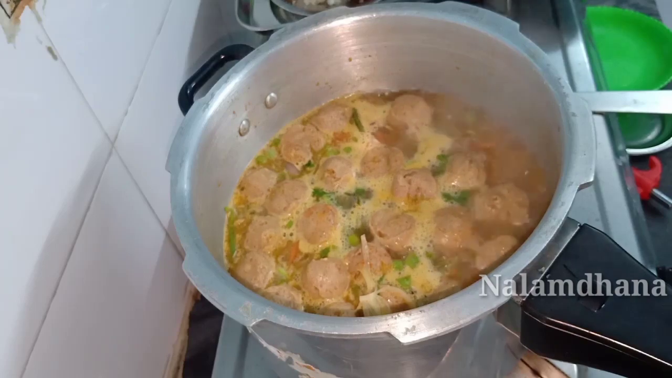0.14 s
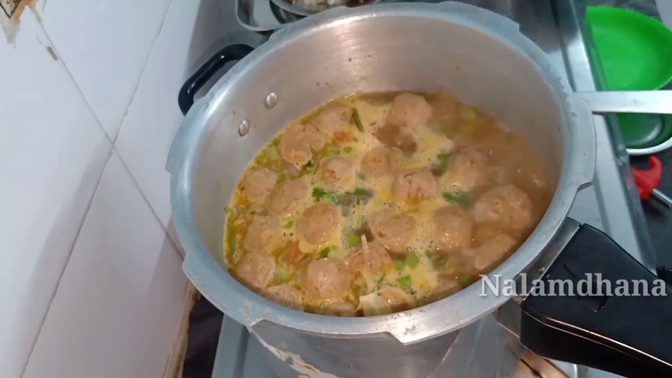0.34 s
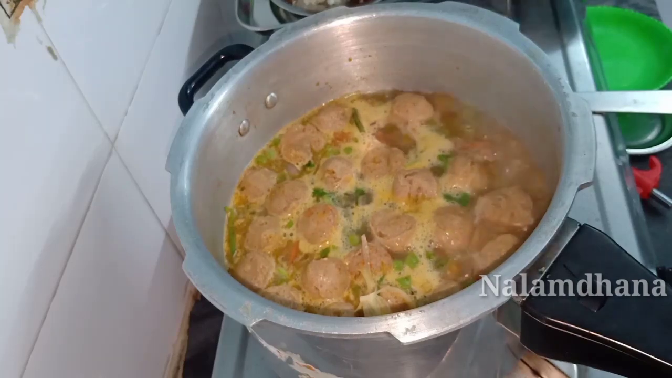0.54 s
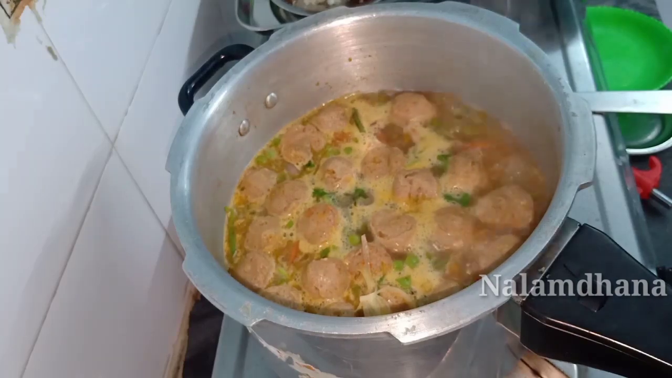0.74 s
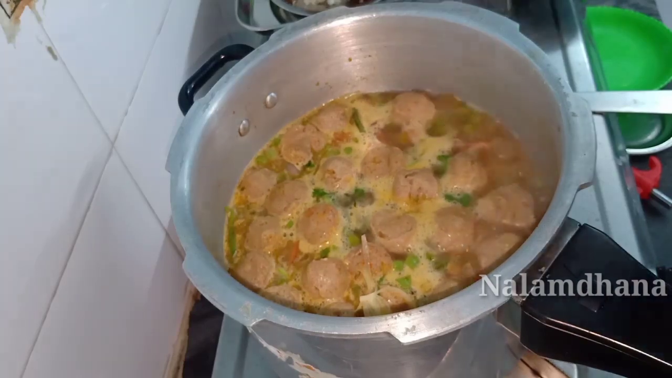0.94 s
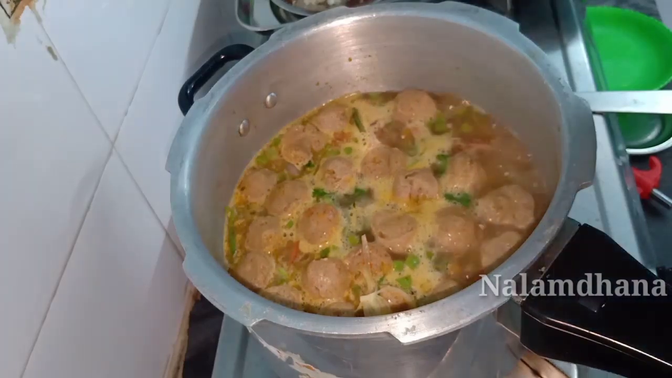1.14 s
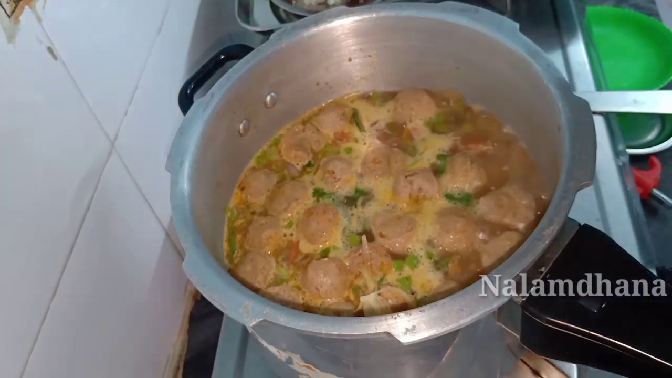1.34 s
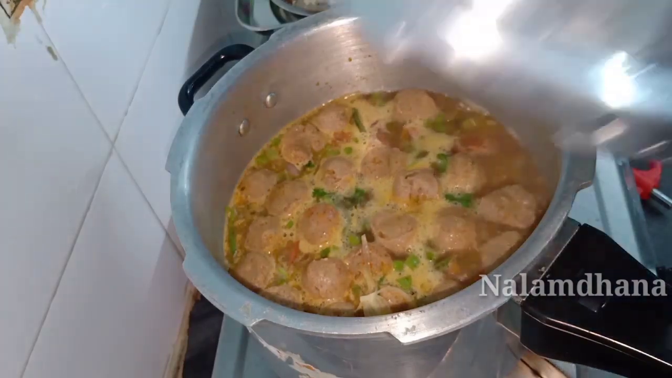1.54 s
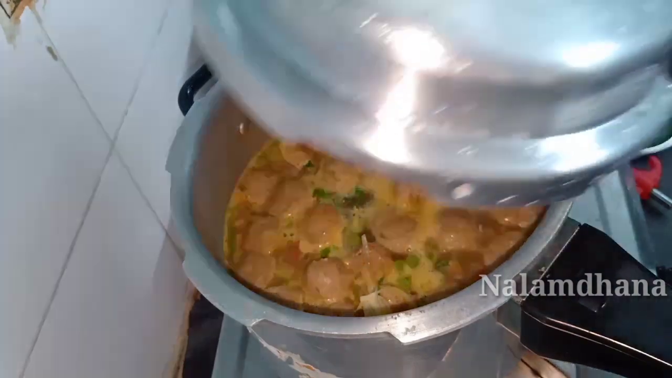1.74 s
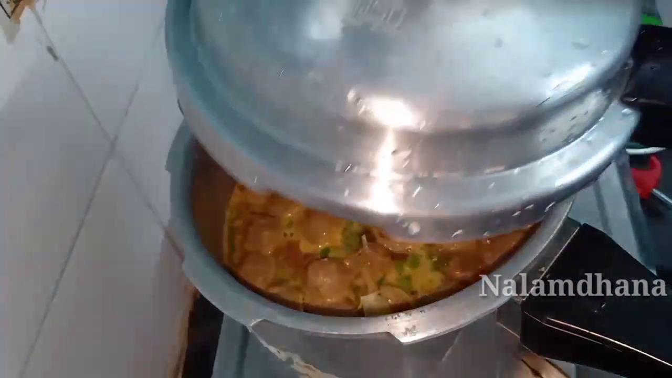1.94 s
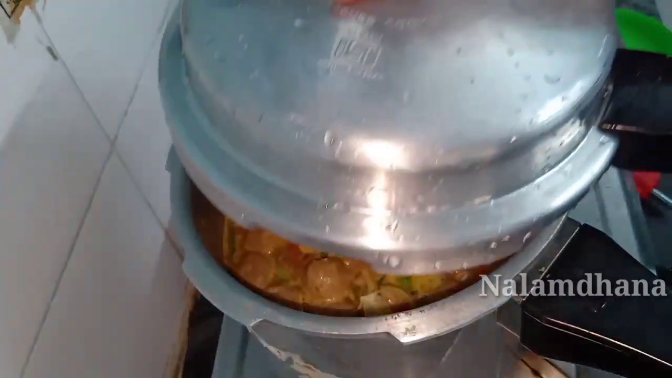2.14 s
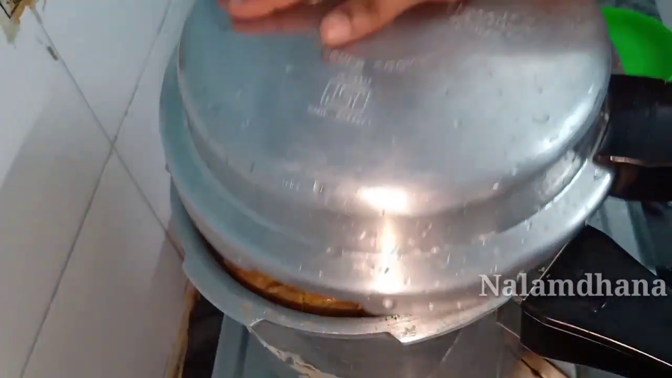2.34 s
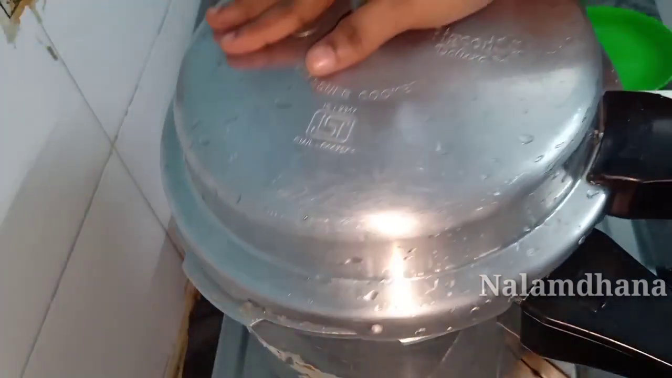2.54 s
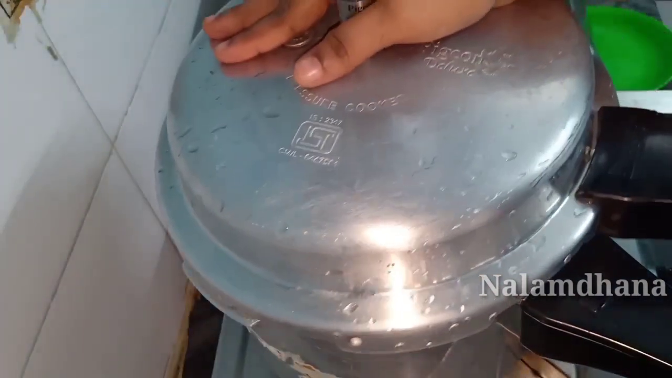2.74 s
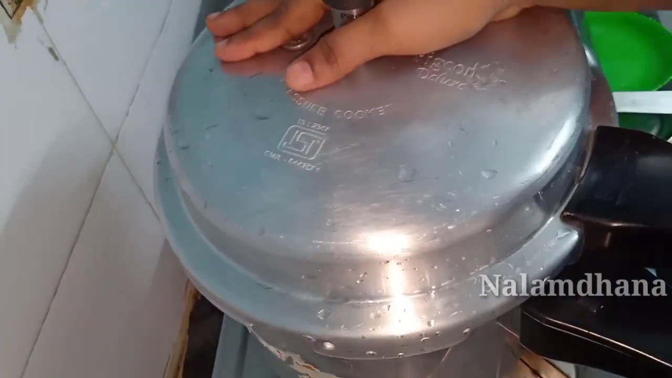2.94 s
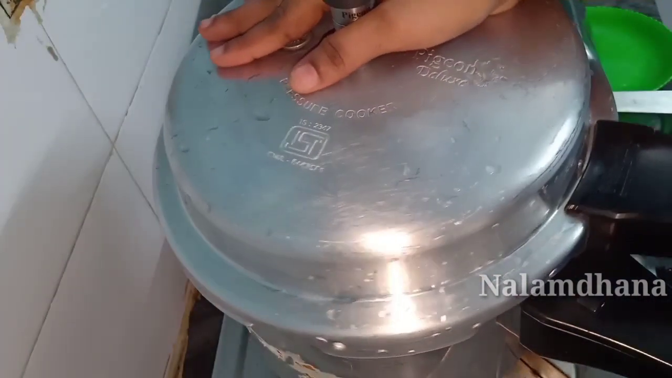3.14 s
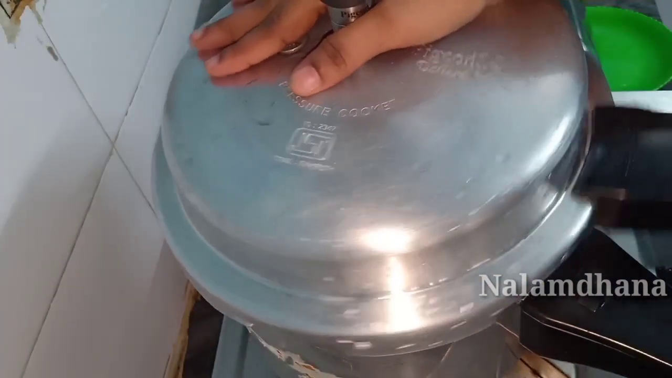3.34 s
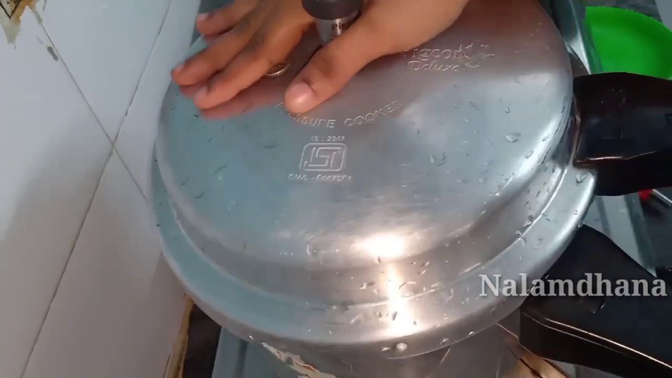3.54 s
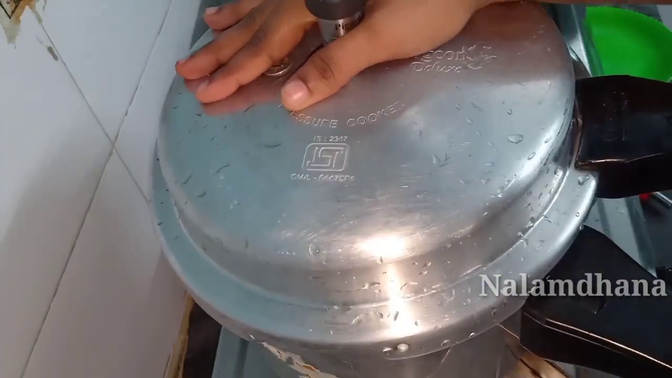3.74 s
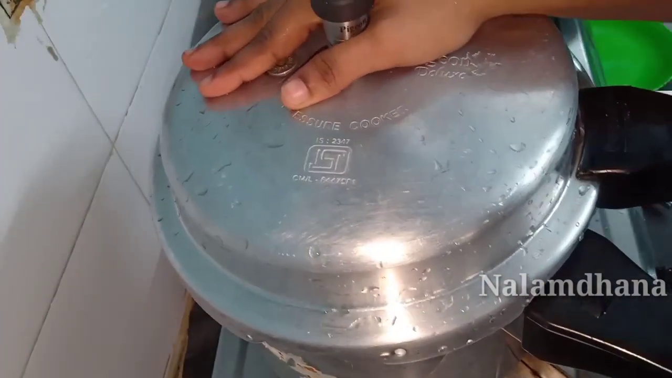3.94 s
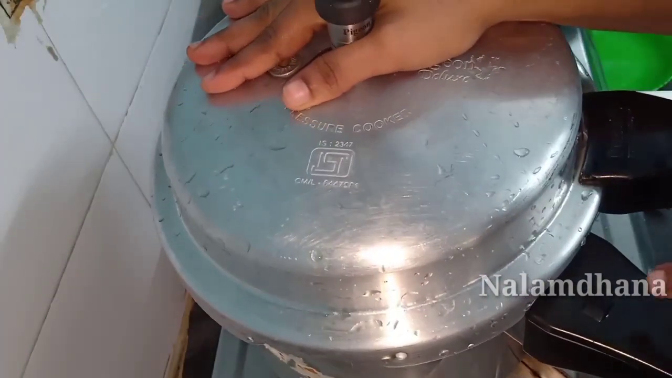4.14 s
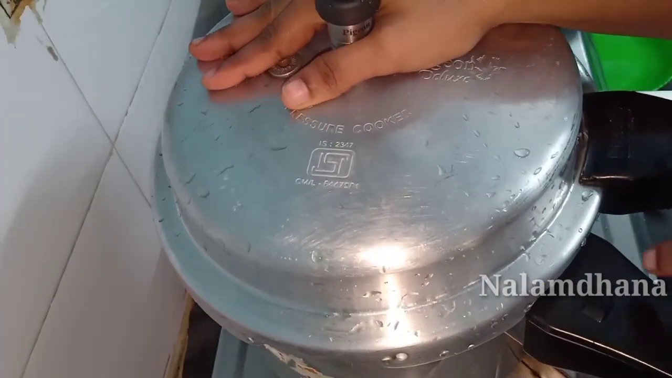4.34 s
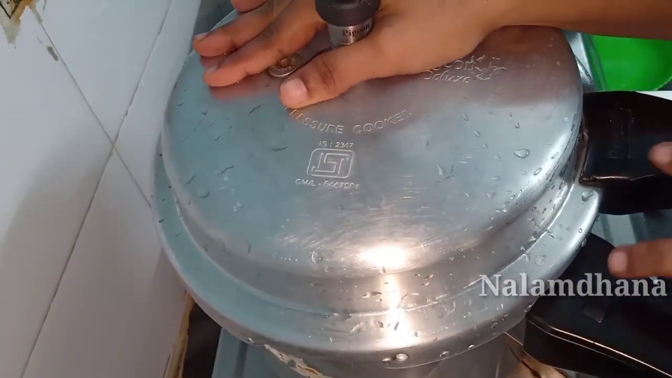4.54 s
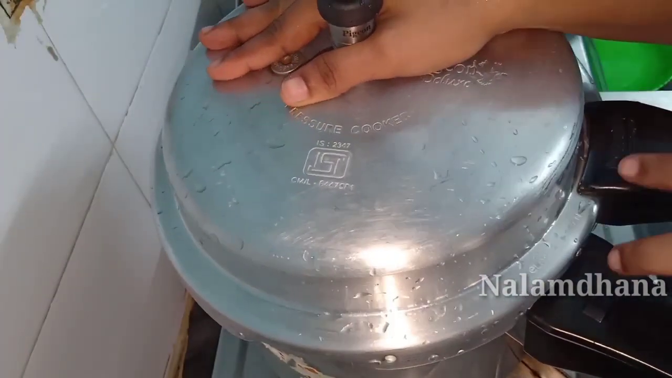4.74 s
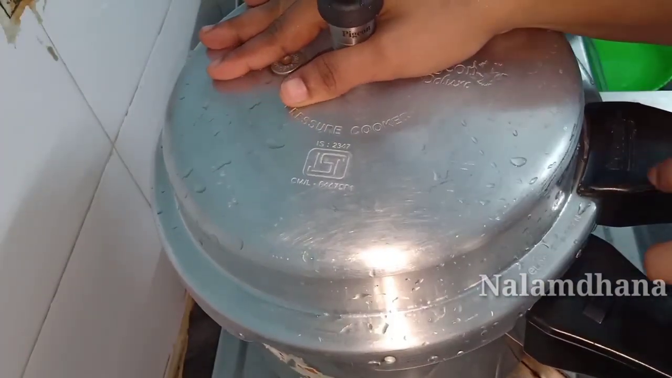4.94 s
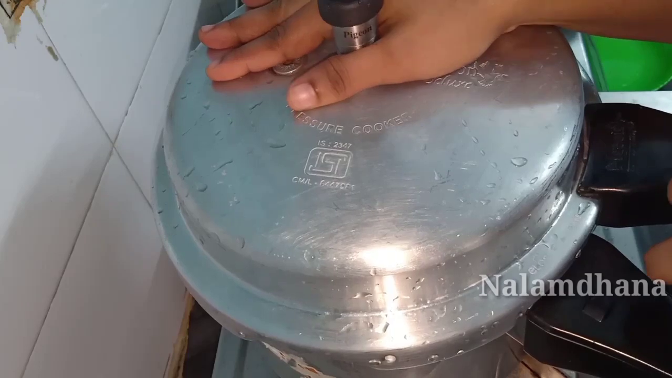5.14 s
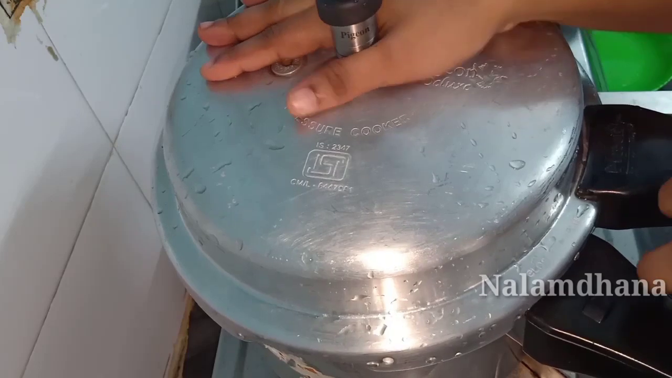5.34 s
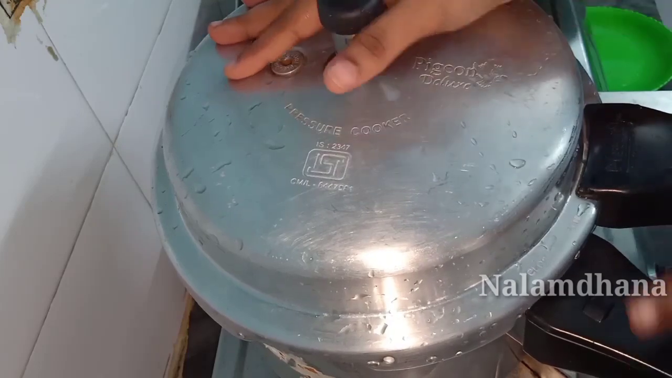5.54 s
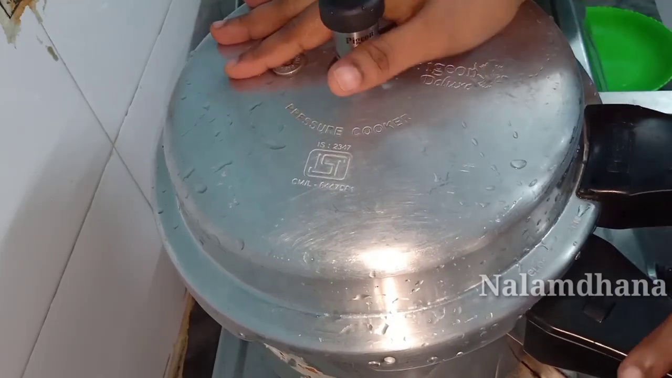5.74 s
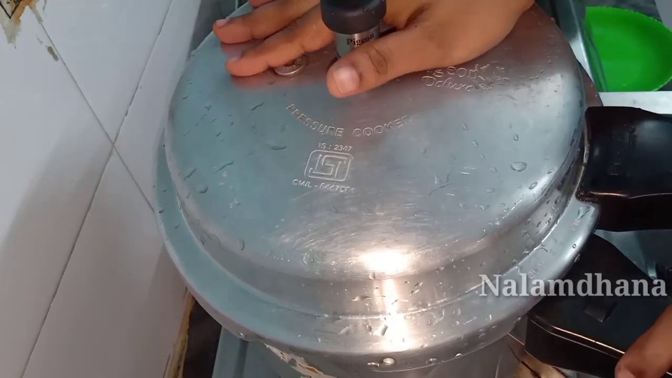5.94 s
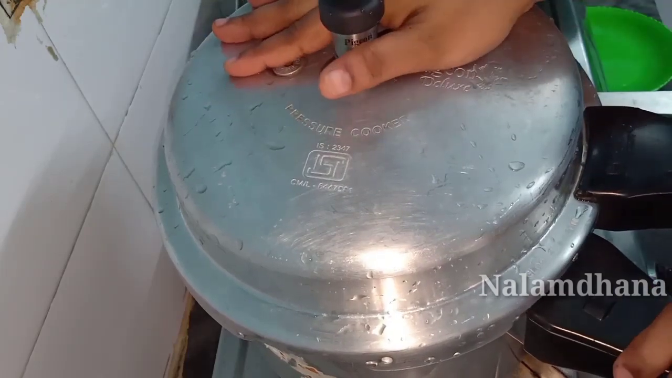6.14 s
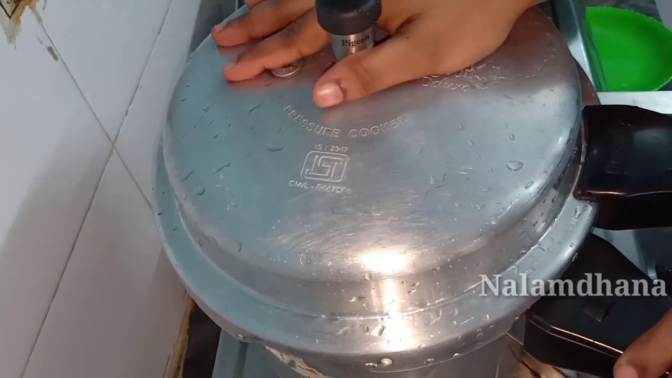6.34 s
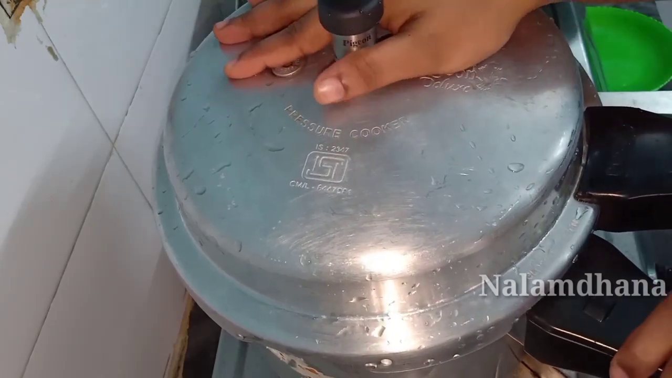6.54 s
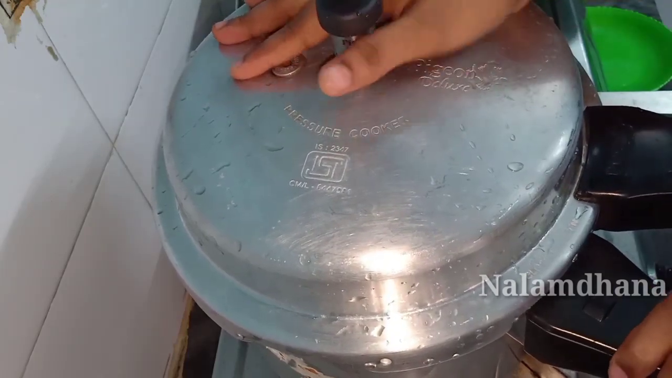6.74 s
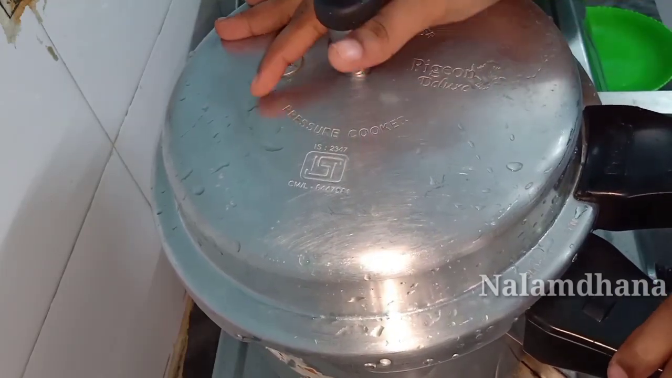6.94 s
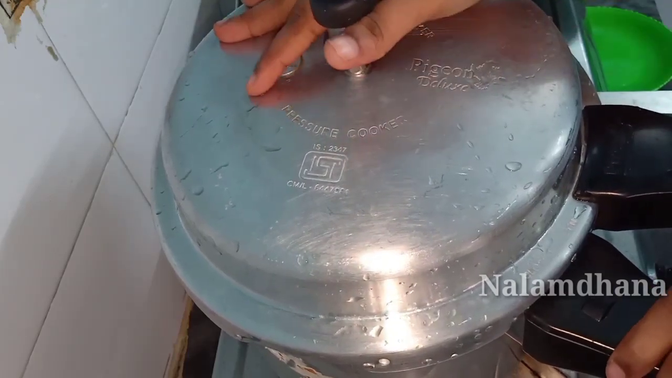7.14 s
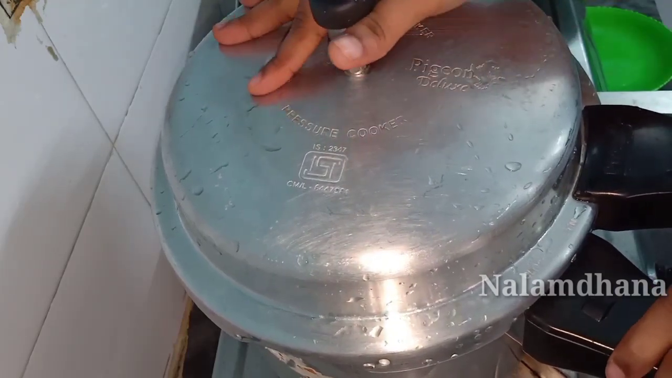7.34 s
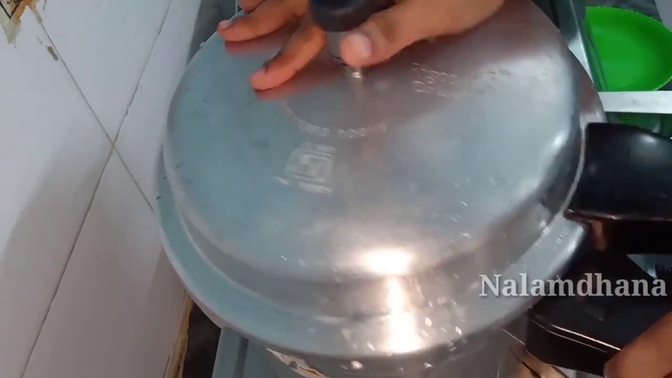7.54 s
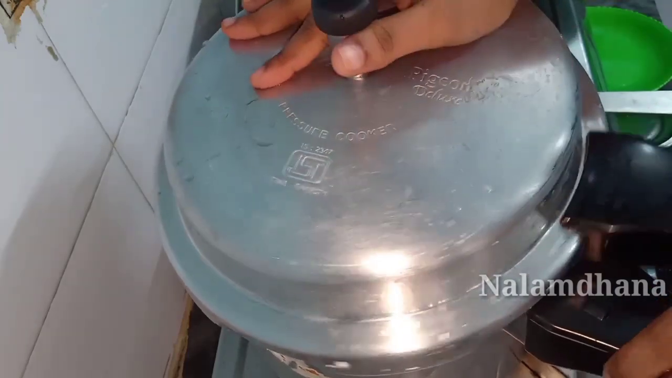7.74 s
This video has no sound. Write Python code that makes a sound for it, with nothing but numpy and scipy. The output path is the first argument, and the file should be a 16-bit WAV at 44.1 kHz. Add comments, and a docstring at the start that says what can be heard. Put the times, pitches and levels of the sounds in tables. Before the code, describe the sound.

At about 0.5 seconds a thin metal lid is picked up, close and to the left, with a bright clatter and a brief ringing scrape. After a quiet stretch, it knocks several times onto a pressure cooker in front, from 2.3 to 2.9 seconds. A loud, fuller clank with scraping comes around 3.4 to 3.5 seconds. Light ticks follow, then a sharp clink at 4.7, smaller taps, and a loud, bright scraping clatter near 5.5. A softer scrape sounds around 6.8, and a last strong knock and scrape at 7.5 seconds, trailed by faint taps. Steam hisses very faintly at first, growing a little from 3.6 seconds and swelling unevenly, with thin, airy whistles from about 3.7 to 5 and 6.6 to 8 seconds. The small tiled kitchen gives the metal a short echo, over a very faint rumble, low drone and electric hum.

```python
"""A metal lid clatters as it is picked up, then knocks, scrapes and twists onto a pressure cooker.
Every touch makes the metal ring briefly; a scrape is many tiny touches close together.
Steam from the hot stew hisses, and at times whistles, through the gap under the rim.
The small tiled kitchen echoes the metal, over a faint rumble, a low drone and an electric hum."""
import sys
import numpy as np
from scipy import signal
from scipy.io import wavfile
from scipy.ndimage import uniform_filter1d

SR = 44100
rng = np.random.default_rng(int(sys.argv[2]) if len(sys.argv) > 2 else 0)


def store_wav(level_fs):
    """Save 16-bit WAV to argv[1]."""
    pcm = np.round(np.clip(np.atleast_2d(level_fs), -1, 1) * 32767)
    wavfile.write(sys.argv[1], SR, pcm.T.astype(np.int16))


N = 348390
BAND_EDGES_HZ = 30 * 2 ** np.arange(0, 9.2, .5)   # half an octave apart


# Knocks and clinks on counter and pot, with a few faint bright ticks:
# t/s, level/dB, bass/dB, treble/dB, favoured f/Hz
COOKER_KNOCKS = [(0.679, -25, -15, -11, 1090), (1.089, -36, -14, -11, 1140), (2.346, -16, -7.5, -9.5, 1640),
                 (2.423, -34.5, 7, -12, 1780), (2.585, -12, -3, -22, 1800), (2.592, -21, 0.5, -24, 170),
                 (2.694, -31.5, 2, -17, 2420), (2.796, -15, -4, -18.5, 1760), (2.806, -22, 4, -11, 292),
                 (2.862, -24, 0, -13, 1180), (3.116, -38.5, -0.5, -18, 291), (3.326, -31, -8, -21.5, 1750),
                 (3.399, -4.5, -8, -15.5, 292), (3.417, -7.5, -6.5, -9.5, 1070),
                 (3.465, -7.5, -3, -16, 1780), (3.476, -17, 1.5, -17, 169), (3.489, -7, -10.5, -4, 2230),
                 (3.51, -16.5, -7, -22, 880), (3.678, -28.5, -2.5, -22, 556),
                 (3.813, -19.5, -2.5, -4.5, 2210), (3.981, -30.5, -2, -15, 480),
                 (4.018, -40.5, 9, 10.5, 3640), (4.1, -37.5, 2, 9.5, 2980), (4.335, -34.5, -6.5, -1, 2890),
                 (4.425, -33, -5, -6, 2565), (4.667, -11, -12, 1, 870), (4.669, -9, -14, -14, 1770),
                 (4.672, -11.5, -9, -22, 2730), (4.819, -24, -21, 4, 2300), (5.062, -18, -7, -3.5, 1725),
                 (5.235, -24.5, -6.5, 2.5, 1930), (5.412, -31, -7, 13.5, 1710),
                 (5.455, -15, -10, -21, 2308), (5.462, -6, -36, -1.5, 1859), (5.472, -6.5, -30, -14, 2300),
                 (5.487, -12, -16, -8, 2380), (5.496, -17, -27, -10, 2380), (5.505, -10, -19, -9, 2080),
                 (5.523, -11.5, -23, -8, 1760), (5.673, -33, -17, -2, 1400), (5.78, -40, -8, -19, 2000),
                 (5.855, -28.5, 0, -11.5, 918), (6.0, -45.5, -20, 8.5, 3000), (6.387, -51.5, -10, 5, 3970),
                 (6.47, -47.5, -16, 2, 3980), (6.678, -29.5, -7, -2, 1660), (6.732, -27.5, -9, -2, 1780),
                 (6.774, -22.5, -24, -3, 2120), (6.781, -20, -12, -14, 2200), (6.81, -28, -6, -2, 2000),
                 (6.958, -25.5, -12.5, -20, 1699), (7.461, -12.5, -13, -10, 788), (7.472, -18, 0, -17, 526),
                 (7.481, -7, -2.5, -5, 2200), (7.487, -7, -11, -16, 1749), (7.724, -32.5, 6.5, -10, 1123),
                 (7.825, -34, -8, -7, 1980)]
# The lid dragged over the pot:
# full strength at t/s, rise/s, hold/s, fall/s, level/dB, bass/dB, treble/dB, favoured f/Hz
COOKER_DRAGS = [(3.335, 0.04, .04, .04, -20, -3.5, -12, 290), (3.4, 0.03, 0.03, .04, -18.5, 0, 2, 288),
                (3.47, .03, 0.041, 0.049, -23.5, 1, -15, 170),
                (5.39, 0.023, 0.028, 0.044, -14.5, -15, -6.5, 1908),
                (5.475, .025, 0.041, 0.103, -13.5, -19, -9.5, 2260),
                (5.68, .02, 0.01697, .03, -24.5, -17, -21, 1880),
                (6.765, 0.06, 0.041, 0.025, -23, -13, 2.5, 1881),
                (7.47, 0.032, 0.012, 0.13, -8.5, -8.5, -5.5, 798)]
# The cooker's modes (tones it rings at; wider ones die sooner): f/Hz, width/Hz, level/dB
COOKER_MODES = [(84.9, 7, -19), (170.3, 23.5, -9), (210.4, 11, -18.5), (296.9, 18, -8), (357.4, 14.5, -12),
                (477, 20, -12), (525, 28, -13.5), (619, 52, -7.5), (723, 47, -3), (865, 94, -5),
                (1056, 25, -16.5), (1146, 39, -14), (1480, 105, -10), (1772, 108, -4), (2080, 164, -5),
                (2347, 117, -7.5), (2730, 51, -12.5), (2915, 78, -13.5), (3717, 49, -14), (4070, 370, 3),
                (4860, 57, -9), (5120, 210, -4.5), (5940, 450, 5.5), (7560, 470, -7)]
# Its countless weak modes, heard as one noisy blur: f/Hz, level/dB
COOKER_BLUR = [(60, -51), (150, -6), (400, 4), (900, 3), (1900, -20.5), (3300, -13.5), (5000, -8),
               (7000, -33), (9500, -34), (13000, -23.5), (15500, -36)]

def lid_on_cooker():
    """The lid is knocked and twisted into place, and the cooker rings. Gives ring and blur."""
    touches = np.vstack([bounces(COOKER_KNOCKS, fall_db=6),
                         scrapes(COOKER_DRAGS, uneven_db=3.5, trim_db=-13.5)])
    return metal(touches, COOKER_MODES, COOKER_BLUR, size=N, ring_db=-9, blur_db=18, smear_s=.0025)


# Knocks as the lid leaves the counter: t/s, level/dB, bass/dB, treble/dB, favoured f/Hz
LID_KNOCKS = [(0.364, -16, 25.5, 2.5, 11700), (0.538, -11.5, -3, 11, 1644), (0.545, -7, -18, 5.5, 2050),
              (0.552, -29.5, -10, -1, 2045), (0.567, -23, -3.5, -1, 1710)]
# The lid dragged as it is lifted:
# full strength at t/s, rise/s, hold/s, fall/s, level/dB, bass/dB, treble/dB, favoured f/Hz
LID_DRAGS = [(.504, .035, .012, .03, -17.5, -8.5, -6.5, 2150),
             (.585, .07, 0.032, 0.19, -21.5, -20.5, 3, 2080)]
# The tones the loose lid rings at: f/Hz, width/Hz, level/dB
LID_MODES = [(1045, 27, -11), (1245, 63, -6), (1702, 41, 4.5), (2033, 38, -2.5), (2390, 43, -4.5),
             (3500, 46, -13.5), (4278, 49, -1.5), (5100, 140, -6), (6010, 60, -3.5), (7640, 92, -9.5),
             (8340, 81, -19.5), (11790, 190, -13.5), (14100, 100, -22.5)]
# The noisy blur of its weak modes: f/Hz, level/dB
LID_BLUR = [(180, -48.5), (400, -32), (850, -20), (2070, -3.5), (3280, -18), (4300, -9), (6150, -19.5),
            (8500, -27.5), (9500, -44.5), (12000, -27), (15500, -43.5)]

def lid_picked_up():
    """The thin dome clatters; each tone is six close neighbours that beat. Gives ring and blur."""
    touches = np.vstack([bounces(LID_KNOCKS, fall_db=19.5),
                         scrapes(LID_DRAGS, uneven_db=-3, trim_db=-4)])
    modes = np.repeat(np.array(LID_MODES, float), 6, axis=0)
    modes[:, 0] *= 1 + .045 * rng.standard_normal(len(modes))
    return metal(touches, modes, LID_BLUR, size=2 * SR, ring_db=-20.5, blur_db=18.5, smear_s=.0044)


def bounces(knocks, fall_db, count=3, spread_s=.006):
    """Each knock is a first touch and quick rebounds: the later, the weaker."""
    touches = np.repeat(np.array(knocks, float), count, axis=0)
    lateness = rng.random((len(knocks), count))
    lateness[:, 0] = 0
    touches[:, 0] += spread_s * lateness.ravel()
    touches[:, 1] -= fall_db * lateness.ravel()
    return touches


def scrapes(drags, uneven_db, trim_db, touches_per_s=600, slots_per_s=2000, edge_db=-22):
    """A dragged rim catches and slips at random: many small touches that swell, hold and fade."""
    touches = []
    for full_s, rise, hold, fall, db, *tone in drags:
        corners_s = [full_s - rise, full_s, full_s + hold, full_s + hold + fall]
        times = np.arange(corners_s[0], corners_s[-1], 1 / slots_per_s)
        chance, grip = rng.random((2, len(times)))
        level_db = db + np.interp(times, corners_s, [edge_db, 0, 0, edge_db])
        level_db += trim_db - uneven_db * np.log(grip + .03)
        slots = np.column_stack([times, level_db, np.tile(tone, (len(times), 1))])
        touches.append(slots[chance < touches_per_s / slots_per_s])
    return np.vstack(touches)


def metal(touches, modes, blur, size, ring_db, blur_db, smear_s):
    """Struck metal gives a clear ring and a noisy blur, with the deepest bass taken away."""
    ring = ringing(touches, modes, size, ring_db, smear_s)
    noise = blurring(touches, blur, size, blur_db, smear_s)
    return np.pad(filtered([ring, noise], 75, "high"), ((0, 0), (0, N - size)))


def ringing(touches, modes, size, ring_db, smear_s):
    """A blow runs round the rim, so the modes start one after another, each with its own strength."""
    ring = 0
    for hz, width_hz, mode_db in modes:
        force, delay, side = rng.random((3, len(touches)))
        level_db = touch_db(touches, hz, favour_db=12, octaves=.2) + mode_db + ring_db
        strength = from_db(level_db + 8 * (force - .5))
        starts = ((touches[:, 0] + smear_s * delay) * SR).astype(int)
        direction = 1 if hz < 400 else np.sign(side - .5)   # low modes are always pushed the same way
        tone = resonate(np.bincount(starts, strength * direction, size), hz, width_hz)
        # the contact lasts a moment, so there is no sharp click far above the pitch
        ring = ring + filtered(tone, min(2 * hz, .45 * SR))
    return ring


def blurring(touches, blur, size, blur_db, smear_s):
    """Modes too many to tell apart sound like a short burst of noise at every touch."""
    white = rng.standard_normal((2, size))
    decay = np.exp(-1 / (smear_s * SR))
    starts = (touches[:, 0] * SR).astype(int)
    bursts = 0
    for k, (low, high) in enumerate(zip(BAND_EDGES_HZ[2:], BAND_EDGES_HZ[3:])):
        hz = np.sqrt(low * high)
        strength = from_db(touch_db(touches, hz, favour_db=8, octaves=.33) + at_hz(blur, hz) + blur_db)
        energy = np.bincount(starts, strength ** 2, size) + 1e-30
        power = signal.lfilter([1 - decay], [1, -decay], energy)
        bursts = bursts + filtered(np.sqrt(power) * white[k % 2], [low, high], "band")
    return bursts


def touch_db(touches, hz, favour_db, octaves):
    """How hard each touch drives this pitch; the spot it lands on favours tones near one pitch."""
    _, level_db, bass_db, treble_db, favoured_hz = touches.T
    bass = np.clip(np.log2(1100 / hz), 0, 1)
    treble = np.clip(np.log2(hz / 2600), 0, 1)
    closeness = np.exp(-(np.log2(hz / favoured_hz) / octaves) ** 2)
    return level_db + bass * bass_db + treble * treble_db + favour_db * closeness


# How loud the steam is: t/s, level/dB
STEAM_LEVELS = [(0, -61), (.34, -60), (1.15, -68), (1.85, -66.5), (2.1, -58.5), (2.35, -59), (3.27, -65.5),
                (3.6, -51.5), (4.62, -46), (5.0, -53.5), (5.32, -46.5), (5.9, -58.5), (6.3, -54),
                (6.66, -59.5), (6.69, -48), (6.8, -46), (7.0, -49), (7.2, -55), (7.43, -60.5),
                (7.65, -45.5), (7.8, -42.5), (7.9, -48)]
# The tone colour of the hiss: f/Hz, level/dB
HISS_COLOUR = [(530, -43), (900, -13), (1030, -7), (1120, 2), (1680, 6), (2860, 6.5), (4010, -3.5),
               (5400, 11), (7200, -2), (9000, -32), (11700, -61.5), (19800, -120)]
# Its sharp top with the pot open, lid loose, gap squeezed, lid seated: from t/s, level over hiss/dB
HISS_TOP_STAGES = [(0, -13.5), (1.949, -11), (6.669, -16), (7.05, -17)]

def steam():
    """Steam hisses through the gap under the rim, sputtering a little; the lid sets how sharp it is."""
    t = np.arange(N) / SR
    hiss = diffuse(N, lambda hz: from_db(at_hz(HISS_COLOUR, hz)), above_hz=900)
    hiss = filtered(rms_one(hiss), 6610, order=4)
    stage_s, stage_db = np.transpose(HISS_TOP_STAGES)
    stepped_db = stage_db[stage_s.searchsorted(t, "right") - 1]
    top_db = uniform_filter1d(stepped_db, size=SR // 20, mode="nearest")
    top = rms_one(filtered(rng.standard_normal((2, N)), 8500, "high", order=4))
    level_db = np.interp(t, *np.transpose(STEAM_LEVELS))
    sputter_db = 1.5 * drift(9)
    return from_db(level_db + sputter_db) * (hiss + whistles() + from_db(top_db) * top)


# Whistles in the gap:
# start t/s, end t/s, start f/Hz, end f/Hz, width/Hz, start level/dB, end level/dB (both over the hiss)
GAP_WHISTLES = [(3.65, 4.995, 2670, 2840, 370, -0.5, 1), (6.58, 7.5, 3420, 3200, 230, 1, 3),
                (6.75, 7.25, 5200, 5130, 520, -1.5, 1), (7.4, 8, 3400, 3650, 120, -4, -6.5)]

def whistles(fade_s=.23, waver_db=1.5):
    """Now and then the gap whistles: narrow noise on a gliding pitch, wavering in loudness."""
    t = np.arange(N) / SR
    sound = 0
    for start, end, start_hz, end_hz, width_hz, start_db, end_db in GAP_WHISTLES:
        flutter = filtered(rng.standard_normal((2, 2, N)), width_hz)
        pitch_hz = np.interp(t, [start, end], [start_hz, end_hz])
        phase = 2 * np.pi * np.cumsum(pitch_hz) / SR
        tone = rms_one(flutter[0] * np.cos(phase) + flutter[1] * np.sin(phase))
        fade = np.clip(np.minimum(t - start, end - t) / fade_s + .5, 0, 1)
        level_db = np.interp(t, [start, end], [start_db, end_db]) + waver_db * drift(16)
        sound = sound + from_db(level_db) * fade * tone
    return sound


# How long the kitchen echoes: f/Hz, t/s taken to fade by 60 dB
ECHO_TIMES = [(100, 0.67), (500, 0.54), (2000, 0.52), (6000, 0.41), (12000, 0.13)]

def kitchen_echo(x, onset_s=.00075):
    """The tiled room answers with a smooth echo whose high notes die first."""
    t = np.arange(SR) / SR
    tail = diffuse(SR, lambda hz: from_db(-60 * t / at_hz(ECHO_TIMES, hz)))
    tail *= np.clip(t / onset_s, 0, 1)
    tail /= np.sqrt(np.sum(tail ** 2) / 2)
    return signal.fftconvolve(x[None], tail, axes=1)[:, :N]


# The tone colour of room rumble and simmering stew: f/Hz, level/dB
RUMBLE_COLOUR = [(25, -19), (70, -19), (130, -12), (230, -12), (350, -10.5), (800, -12), (1300, -25.5),
                 (2200, -16), (5900, -69.5), (9800, -49), (15500, -53.5)]

def room_rumble():
    """Room and stew make a faint, patchy noise: each band swells and sinks on its own."""
    rumble = diffuse(N, lambda hz: from_db(at_hz(RUMBLE_COLOUR, hz) + 4 * drift(12)))
    return from_db(-59) * rms_one(rumble)


def low_drone():
    """A rough low drone, like a gas flame: noise narrowed to one pitch."""
    drone = rng.standard_normal(N)
    for _ in range(2):
        drone = resonate(drone, hz=158.1, width_hz=48)
    return from_db(-64.5) * rms_one(drone)


# The tones of the electric hum: f/Hz, level/dB
HUM_TONES = [(50, -73.5), (100, -71), (150, -69), (350, -70.5)]

def mains_hum():
    """Mains power hums on a few pure tones that waver slightly in loudness."""
    t = np.arange(N) / SR
    return sum(np.sqrt(2) * from_db(db + .4 * drift(3.1)) * np.sin(2 * np.pi * hz * t)
               for hz, db in HUM_TONES)


# How alike left and right are for sound from all around: f/Hz, likeness (1 = the same)
STEREO_LIKENESS = [(100, 0.93), (400, 0.67), (1200, 0.048), (4000, 0.02)]

def diffuse(size, gain_at, above_hz=0):
    """Noise from all around, built band by band; gain_at(hz) sets how strong each band is."""
    edges = BAND_EDGES_HZ[BAND_EDGES_HZ >= above_hz]
    white = rng.standard_normal((2, 2, size))
    noise = 0
    for k, (low, high) in enumerate(zip(edges, edges[1:])):
        shared, opposed = filtered(white[k % 2], [low, high], "band")
        hz = np.sqrt(low * high)
        alike = np.clip(at_hz(STEREO_LIKENESS, hz), 0, 1)
        stereo = np.sqrt(1 + alike) * shared + np.sqrt(1 - alike) * opposed * [[1], [-1]]
        noise = noise + gain_at(hz) * stereo
    return noise


def placed(x, left_lag_us, pan_db):
    """A near sound reaches one microphone a little earlier; pan_db makes the left side louder."""
    n = np.arange(N)
    shift = left_lag_us * 1e-6 * SR / 2
    pair = np.array([np.interp(n - shift, n, x), np.interp(n + shift, n, x)])
    return pair * from_db([[pan_db / 2], [-pan_db / 2]])


def resonate(x, hz, width_hz):
    """One mode: each click going in starts a dying wave at this pitch."""
    decay, angle = np.exp(-np.pi * width_hz / SR), 2 * np.pi * hz / SR
    return signal.lfilter([.5, 0, -.5], [1, -2 * decay * np.cos(angle), decay ** 2], x + 1e-18)


def drift(rate_hz, step=40, warm_up=2000):
    """A slow random wander, about 1 in size."""
    decay = np.exp(-2 * np.pi * rate_hz * step / SR)
    white = rng.standard_normal(N // step + warm_up + 2)
    slow = signal.lfilter([1], [1, -2 * decay, decay ** 2], white)[warm_up:]
    return np.interp(np.arange(N) / step, np.arange(len(slow)), rms_one(slow))


def filtered(x, hz, keep="low", order=2):
    """Keep what is below hz ("low"), above it ("high") or between two pitches ("band")."""
    return signal.sosfilt(signal.butter(order, hz, keep, fs=SR, output="sos"), x)


def at_hz(table, hz):
    """Read between the rows of a table, with every octave equally wide."""
    pitches, values = np.transpose(table)
    return np.interp(np.log(hz), np.log(pitches), values)


def from_db(db):
    """Turn decibels into a number to multiply by."""
    return 10 ** (np.asarray(db) / 20)


def rms_one(x):
    """Scale a sound so its average power is 1."""
    return x / np.sqrt(np.mean(x ** 2) + 1e-20)


def scene():
    """The loose lid to the left, the cooker in front, then echo, steam and background."""
    lid, cooker = lid_picked_up(), lid_on_cooker()
    near = placed(sum(lid), left_lag_us=-330, pan_db=6.5)
    near += placed(sum(cooker), left_lag_us=54, pan_db=.9)
    # the clear ring beams towards the listener, so more blur than ring spreads round the room
    into_room = from_db([-4, -1.5]) @ lid + from_db([-11, 1.5]) @ cooker
    return near + kitchen_echo(into_room) + steam() + room_rumble() + low_drone() + mains_hum()


def record(dry):
    """The microphones lose the deepest bass, round off loud peaks and cut the highest treble."""
    thinned = filtered(dry, 30, "high")
    rounded = .95 * np.tanh(thinned / .95)
    return signal.sosfilt(signal.cheby2(14, 80, 16900, fs=SR, output="sos"), rounded)


dry = scene()
out = record(dry)
store_wav(out)
```